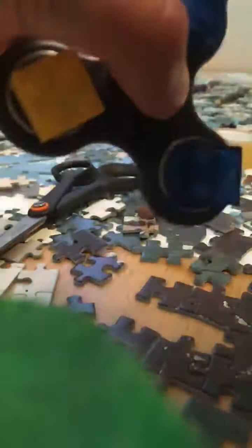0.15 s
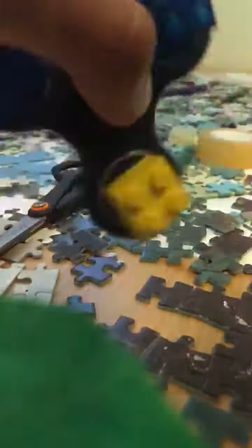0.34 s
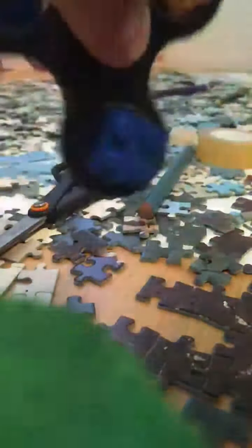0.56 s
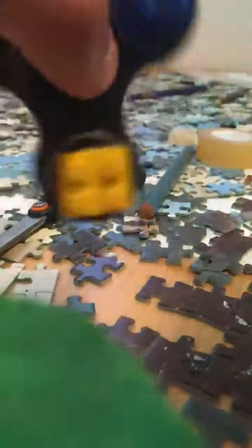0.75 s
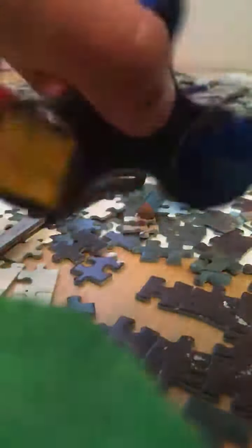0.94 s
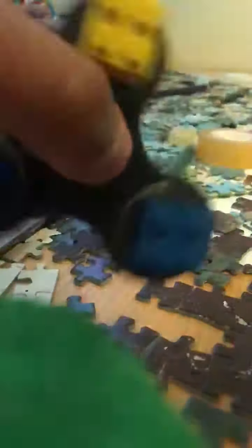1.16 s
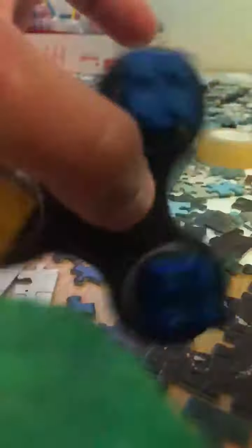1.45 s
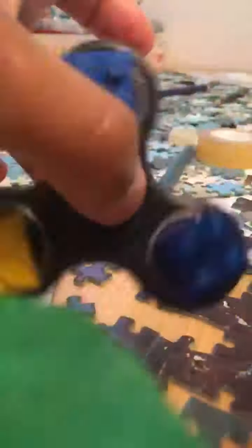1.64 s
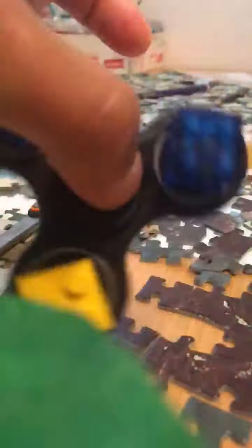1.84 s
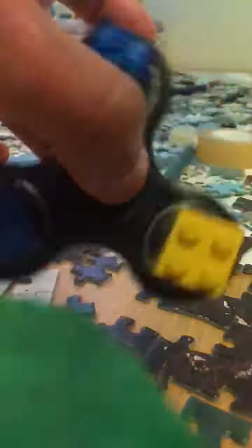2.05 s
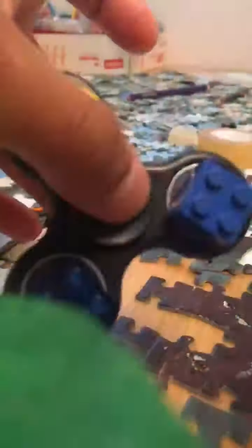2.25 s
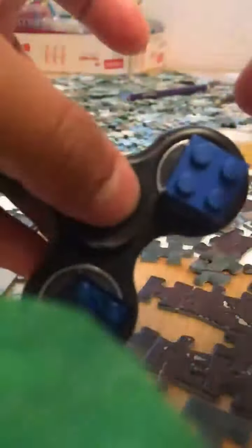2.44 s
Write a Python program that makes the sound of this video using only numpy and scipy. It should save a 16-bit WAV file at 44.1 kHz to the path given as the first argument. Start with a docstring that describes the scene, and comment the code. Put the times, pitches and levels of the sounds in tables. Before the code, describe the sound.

Sharp irregular plastic clicks and clatter from a finger spinner, close up in a quiet room

```python
"""A plastic hand spinner with loose toy bricks in its rings is turned and shaken close to a phone in a quiet room.
Filtered-noise hiss and a low hum of two sines run throughout; the hiss dips once near 0.2 s.
From 0.25 s each knock excites decaying modes and a noise crack, followed by small bounces and chatter;
among the knocks the grip thumps as gliding sines, the arms tick as beating sines
and the bricks scrape as trains of clicks through resonances; the room returns a short noise tail."""
import sys
import numpy as np
from scipy import signal
from scipy.fft import rfft, irfft
from scipy.io import wavfile

SR = 44100
rng = np.random.default_rng(int(sys.argv[2]) if len(sys.argv) > 2 else 0)


def gain_from_decibels(decibels):
    """Convert decibel values to linear amplitude factors."""
    exponent = np.asarray(decibels, float) / 20
    return 10 ** exponent


def int16_out(signal):
    """Quantize to a 16-bit WAV file."""
    q = np.round(np.clip(np.atleast_2d(signal).T, -1, 1) * 32767)
    wavfile.write(sys.argv[1], SR, q.astype(np.int16))


N = 114660

# modes of bricks and arms: [f/Hz, relative level when free/dB, relative level when damped/dB, free t60/s]
TOY_MODES = [(2054, -30.5, -38.5, 0.055), (3329, -12.5, -12, 0.014), (3736, -1.5, -1.5, 0.0077),
             (3953, -5, -3, 0.015), (4450, 3, -18, 0.017), (4553, -3, -13.5, 0.021), (5552, -4, 1, 0.013),
             (5913, -6, -3, 0.019), (6375, -13.5, -13, 0.024), (6660, -11, -24.5, 0.0024),
             (8940, -17.5, -11, 0.012), (8900, 0, 2.5, 0.015), (10610, -0.5, -2.5, 0.0074),
             (11440, 0, -2.5, .012), (12710, -4.5, -3.5, 0.0074), (14330, 2.5, -1, 0.009)]


def coloured(x, points):
    """Linear filtering: the spectrum is weighted by levels interpolated over log frequency."""
    f_points, level_db = np.array(points, float).T
    n = x.shape[-1]
    f = np.maximum(np.arange(n // 2 + 1) * SR / n, 1)
    gain = gain_from_decibels(np.interp(np.log(f), np.log(f_points), level_db))
    return irfft(rfft(x) * gain, n)


def fade(t, t60):
    """Exponential decay: the amplitude is 60 dB down after t60 seconds."""
    return np.exp(-np.log(1000) * t / t60)


def add(out, start_s, sound):
    """Superposition: a sound is summed into the mix from its start time."""
    i = int(start_s * SR)
    out[i:i + len(sound)] += sound[:len(out) - i]


def spinner():
    """Impact excitation: free and damped knocks strike the modes, each followed by dying chatter."""
    # knocks that leave the toy free to ring: [t/s, relative level/dB of arms 3-5 kHz,
    # brick walls 5-7 kHz, studs 9 kHz, edges over 10 kHz]
    ringing_knocks = [(0.3069, -10.5, -9, -15, -22), (0.323, -8, -10, -13, -16),
                      (0.4585, -33, -45.5, -48, -47), (0.4807, -10.5, -10.5, -18, -23),
                      (0.4934, -25.5, -36, -52.5, -41), (0.5022, -28.5, -29.5, -28.5, -35.5),
                      (0.5254, -30, -44.5, -36, -49.5), (0.5494, -22.5, -31, -46, -36),
                      (0.5788, -13, -33, -18.5, -43), (0.5881, -21, -22, -33, -44),
                      (0.6046, -13, -13.5, -19, -16.5), (0.6137, -28, -21, -41.5, -42.5),
                      (0.6579, -14, -6, -2.5, -10.5), (0.6632, -11.5, -34, -10.5, -11),
                      (0.673, -18, -31, -32.5, -35.5), (0.7188, -6.5, -13, -13, -8.5),
                      (0.7229, -13.5, -13, -27, -26), (0.7298, -11.5, -8.5, -5.5, -19),
                      (0.743, -39, -38, -18.5, -30.5), (0.7722, -4.5, -28, -22, -25.5),
                      (0.784, -20, -20, -30, -47.5), (0.7978, -49, -34, -35.5, -44.5),
                      (0.8699, -9, -5, -9.5, -19.5), (0.876, -12, -33, -32, -34),
                      (0.885, -17.5, -16, -22, -10.5), (1.0495, -19.5, -20.5, -16.5, -21.5),
                      (1.0983, -17, -41, -43, -45), (1.1656, -34.5, -44, -33, -54.5),
                      (1.179, -33, -57, -51, -52.5), (1.2006, -10.5, -5.5, -6.5, -17.5),
                      (1.209, -11, -12, -10, -25.5), (1.22, -28.5, -34.5, -39, -38),
                      (1.2618, -25, -33.5, -38, -43), (1.2815, -28, -33, -38, -43),
                      (1.3629, -11.5, -10.5, -8.5, -10), (1.3731, -15.5, -14.5, -13, -22),
                      (1.3837, -33.5, -23, -36, -36.5), (1.4707, -35.5, -51, -38.5, -47),
                      (1.5499, -18.5, -13, -13.5, -19), (1.566, -35, -31, -35, -26.5),
                      (1.5708, -24.5, -24.5, -40, -35), (1.6029, -23.5, -29.5, -38, -35.5),
                      (1.62, -30, -36, -40, -43.5), (1.6695, -26, -42, -37.5, -42),
                      (1.77, -28.5, -30, -24.5, -32.5), (1.8177, -13.5, -3, -9, -17.5),
                      (1.8261, -20.5, -26, -35, -44), (1.861, -42.5, -35, -46, -50),
                      (1.918, -41, -43, -41, -50), (1.9605, -13, -11, -10.5, -18),
                      (1.972, -20, -21, -39, -38.5), (1.983, -30.5, -18, -24, -36),
                      (2.004, -29, -33, -47, -39), (2.0606, -26, -40.5, -51, -51),
                      (2.2364, -19.5, -28, -20, -29), (2.2603, -21, -27, -30, -35),
                      (2.2776, -31.5, -39, -51.5, -38), (2.2973, -28, -28.5, -25, -44),
                      (2.3263, -21.5, -21.5, -39, -34), (2.333, -22, -39, -27.5, -29),
                      (2.3472, -17.5, -19, -21, -28), (2.3866, -20, -25, -25.5, -31),
                      (2.4177, -36, -34, -59, -53), (2.434, -36, -42, -52, -50)]
    # knocks damped by the grip: [t/s, then the same four relative levels/dB]
    damped_knocks = [(0.249, -21, -17, -20, -13), (0.2537, -8, -11, -23.5, -14),
                     (0.2658, -13.5, -15.5, -22, -18), (0.2731, -24, -30.5, -19, -27),
                     (0.3779, -15, -26, -16.5, -20), (0.3895, -16.5, -20, -22.5, -39),
                     (0.402, -35, -40, -52, -55), (0.411, -38, -48.5, -57, -55),
                     (0.4285, -39, -58, -63, -55), (0.6304, -34, -46, -27, -39),
                     (0.6507, -24, -49, -27.5, -37), (0.6893, -18, -18.5, -13.5, -20),
                     (0.7015, -34, -48, -38, -35), (0.8927, -52, -35, -36, -46),
                     (1.0792, -14.5, -11.5, -3.5, -13.5), (1.0898, -20, -18.5, -33, -46),
                     (1.114, -14, -20.5, -16.5, -19), (1.123, -35, -49, -58, -51),
                     (1.1408, -13.5, -24, -31, -26.5), (1.417, -11, -13.5, -14.5, -28),
                     (1.4271, -6.5, -6, -13.5, -18.5), (1.4484, -22, -37.5, -36, -45),
                     (1.5383, -9, -10.5, -10, -12), (1.598, -9, -12.5, -17.5, -16),
                     (1.625, -23, -23, -20.5, -28), (1.63, -30.5, -26.5, -41, -41.5),
                     (1.727, -11, -17.5, -2, -19.5), (1.753, -31, -32, -41, -36),
                     (1.7615, -29.5, -22.5, -33, -26), (1.7656, -36, -25.5, -36.5, -23),
                     (1.796, -6.5, -14, -8, -25), (1.871, -28, -44, -43.5, -47.5),
                     (1.879, -23.5, -28, -38, -35), (2.04, -11, -11.5, -7.5, -22),
                     (2.052, -8, -10.5, -21, -35.5), (2.067, -22.5, -37.5, -24, -35),
                     (2.2237, -10, -13.5, -38, -22.5), (2.2318, -42, -25.5, -23, -27),
                     (2.2473, -32, -19.5, -22, -25), (2.315, -15, -25.5, -25.5, -31),
                     (2.3176, -9, -29, -24, -30), (2.367, -29.5, -29, -29.5, -40)]
    free_rows = np.array(ringing_knocks, float)
    damped_rows = np.array(damped_knocks, float)
    small = chatter(np.concatenate([free_rows, damped_rows]))
    knock_scatter_db, chatter_scatter_db = 2.5, 6
    knock_length, chatter_length = 2048, 768  # samples
    groups = (
        (free_rows, False, knock_length, knock_scatter_db),
        (damped_rows, True, knock_length, knock_scatter_db),
        (small[::2], False, chatter_length, chatter_scatter_db),
        (small[1::2], True, chatter_length, chatter_scatter_db),
    )
    out = np.zeros(N)
    for rows, damped, length, scatter_db in groups:
        for row in rows:
            chance = rng.standard_normal((4, len(TOY_MODES), 1))
            noise = rng.standard_normal(length)
            add(out, row[0], knock(row[1:], damped, scatter_db, chance, noise))
    return out


def chatter(knocks):
    """Poisson process: random small impacts follow the decaying power of all earlier knocks."""
    count, rate_per_s = 1500, 220
    base_db, spread_db, treble_db = -27, 4, -9
    decay_t60_s = 0.13
    times = np.cumsum(rng.exponential(size=count)) / rate_per_s
    age = times[:, None] - knocks[:, 0]
    decayed_power = (age > 0) * fade(np.abs(age), decay_t60_s) ** 2
    power = decayed_power @ gain_from_decibels(2 * knocks[:, 1:]) + 1e-12
    chance_db = spread_db * rng.exponential(size=(count, 1))
    small = np.c_[times, 10 * np.log10(power) + base_db + chance_db]
    small[:, 3:] += treble_db  # studs and edges
    return small[times < N / SR]


def knock(part_db, damped, scatter_db, chance, noise):
    """Modal superposition: decaying sines of scattered level, pitch and decay under a broadband crack."""
    # centres of the four parts: [f/Hz]
    part_hz = (3900, 6100, 9000, 13000)
    # boundaries between the four parts: [f/Hz]
    part_edges_hz = (5100, 7400, 10200)
    detune, decay_scatter = 0.0092, 0.19  # fractional pitch spread, log decay spread
    crack_t60_s, crack_low_hz, crack_low_db = 0.019, 1296, -23
    hz, free_db, damped_db, t60 = np.array(TOY_MODES).T[:, :, None]
    if damped:
        mode_db, t60_share, rise_s = damped_db, 0.94, 0.00028
    else:
        mode_db, t60_share, rise_s = free_db, 1, 0.00043
    t = np.arange(len(noise)) / SR

    gain = gain_from_decibels(mode_db + part_db[np.searchsorted(part_edges_hz, hz)] + scatter_db * chance[0])
    decay = fade(t, t60_share * t60 * np.exp(decay_scatter * chance[1]))
    phase = 2 * np.pi * hz * (1 + detune * chance[2]) * t + chance[3]
    ring = (gain * decay * np.sin(phase)).sum(axis=0)

    # the crack follows the part levels, with a weaker low end
    colour = [(crack_low_hz, part_db[0] + crack_low_db)] + list(zip(part_hz, part_db))
    crack = coloured(noise, colour) * fade(t, crack_t60_s)
    return (ring + crack) * (1 - np.exp(-t / rise_s))


def scrapes():
    """Stick-slip friction: bricks sliding in their rings give uneven clicks that excite low resonances."""
    # slides of the bricks: [t/s, length/s, relative level/dB]
    slides = [(0.295, 0.032, -29), (0.661, 0.031, -25.5), (0.715, 0.012, -40.5), (0.789, 0.015, -38.5),
              (0.873, 0.025, -42.5), (1.073, 0.0062, -17.5), (1.078, 0.034, -37), (1.211, 0.015, -33),
              (1.609, 0.043, -32.5), (1.749, 0.035, -32), (1.859, 0.042, -41), (2.221, 0.043, -33),
              (2.396, 0.053, -43)]
    # spectrum of the clicks: [f/Hz, relative level/dB]
    slip_colour = [(400, -14), (1300, -14.5), (1800, -8.5), (3500, 0), (6000, -5.5), (10000, 0),
                   (16000, -15)]
    # resonances of the sliding bricks: [f/Hz, bandwidth/Hz, relative level/dB]
    slip_rings = [(1580, 120, 1), (2140, 110, -3.5), (3220, 240, 1.5)]
    rate_per_s, grain_spread_db = 1000, 3.5
    t = np.arange(N) / SR
    happens = rng.random(N) < rate_per_s / SR
    size = rng.standard_normal(N) * gain_from_decibels(grain_spread_db * rng.standard_normal(N))
    clicks = happens * size
    shape = np.zeros(N)
    for start_s, length_s, db in slides:
        progress = np.clip((t - start_s) / length_s, 0, 1)
        shape += gain_from_decibels(db) * np.sqrt(np.abs(np.sin(np.pi * progress)))
    slips = coloured(shape * clicks, slip_colour) / np.std(coloured(clicks, slip_colour))
    out = slips / 2
    for hz, width_hz, db in slip_rings:
        b, a = signal.iirpeak(hz, hz / width_hz, SR)
        out += gain_from_decibels(db) * signal.lfilter(b, a, slips)
    return out


def ticks():
    """Beating: three close modes of the hollow arms interfere in each short, rough, dull tick."""
    # ticks of the hollow arms: [t/s, nominal level/dB, f/Hz]
    arm_ticks = [(.264, -47, 2140), (.3775, -11.5, 2730), (.389, -16, 3100), (.4295, -46, 1520),
                 (.675, -21, 2030), (.686, -25.5, 1560), (.731, -23.5, 2030), (0.9848, -45, 1580),
                 (1.0065, -39, 1640), (1.628, -33.5, 1980), (1.861, -42, 1520), (1.878, -21.5, 3000),
                 (1.882, -25, 2600), (1.918, -39.5, 1600)]
    t60_at_1600_hz_s, t60_fall = 0.035, 2  # t60 falls with frequency to this power
    pitch_spread = 0.031  # fractional
    out, t = np.zeros(N), np.arange(2048) / SR
    for start_s, db, hz in arm_ticks:
        mode_hz = hz * (1 + pitch_spread * rng.standard_normal((3, 1)))
        ring = np.sin(2 * np.pi * mode_hz * t).mean(axis=0)
        decay = fade(t, t60_at_1600_hz_s * (1600 / hz) ** t60_fall)
        rise = 1 - np.exp(-t * hz)
        add(out, start_s, gain_from_decibels(db) * ring * decay * rise)
    return out


def fingers():
    """Damped oscillation: fingers shifting the grip give low thumps of exponentially falling pitch."""
    # thumps of the grip: [t/s, amplitude before decay/dB]
    thumps = [(0.25, -42), (0.66, -35.5), (1.075, -36.5)]
    start_hz, end_hz, glide_s, t60_s = 203, 79, 0.0028, 0.09
    out, t = np.zeros(N), np.arange(4096) / SR
    # phase in turns: the integral of the gliding frequency
    turns = end_hz * t + (start_hz - end_hz) * glide_s * (1 - np.exp(-t / glide_s))
    thump = np.sin(2 * np.pi * turns) * fade(t, t60_s)
    for start_s, db in thumps:
        add(out, start_s, gain_from_decibels(db) * thump)
    return out


def room(near):
    """Reverberation: convolution with coloured, decaying noise of unit energy stands for diffuse echoes."""
    # colour of the room's return: [f/Hz, relative level/dB]
    return_colour = [(500, 10), (1500, 14), (3000, -4), (5000, -3), (9000, -20), (16000, -24)]
    level_db, t60_s, build_up_s = -15.5, 0.23, 0.011
    t = np.arange(SR // 2) / SR
    tail = coloured(rng.standard_normal(len(t)), return_colour)
    tail *= fade(t, t60_s) * (1 - np.exp(-t / build_up_s))
    tail /= np.sqrt(np.sum(tail ** 2))
    return gain_from_decibels(level_db) * signal.fftconvolve(near, tail)[:N]


def background():
    """Stationary noise and beats: coloured hiss of slowly set level over two low hum tones."""
    # spectrum of the hiss: [f/Hz, relative level per Hz/dB]
    hiss_colour = [(62, -44), (105, -8), (272, -10), (443, -15.5), (608, -16), (13100, -23.5),
                   (16500, -31.5)]
    # course of the hiss, dipping once: [t/s, relative level/dB]
    hiss_swell = [(0, -2.5), (.18, -4), (.2, -11.5), (.24, -7.5), (.26, -1.5), (2.6, 0.5)]
    # hum tones: [f/Hz, rms level ahead of the bass cut/dB]
    hum_tones = [(61, -60), (75.4, -61.5)]
    hiss_db = -57.5  # rms where the relative level is 0 dB
    t = np.arange(N) / SR
    hiss = coloured(rng.standard_normal(N), hiss_colour)
    hiss *= gain_from_decibels(hiss_db + np.interp(t, *np.array(hiss_swell).T)) / np.std(hiss)
    hum = np.zeros(N)
    for hz, db in hum_tones:
        hum += np.sqrt(2) * gain_from_decibels(db) * np.sin(2 * np.pi * (hz * t + rng.random()))
    return hiss + hum


def scene():
    """Superposition: the near sounds and their room return join the ticks and background."""
    near = spinner() + fingers() + scrapes()
    return (near + room(near) + ticks() + background())[None]


def low_pass(x):
    """Removes everything above the highest recorded frequency."""
    return signal.sosfilt(signal.butter(12, 16820, fs=SR, output="sos"), x)


def record(dry):
    """Clipping and band limiting: the phone flattens the loudest peaks and cuts bass and top."""
    ceiling, bass_cut_hz, top_hz = 0.85, 62, 15750
    clipped = np.clip(dry, -ceiling, ceiling)
    bass_cut = signal.butter(2, bass_cut_hz, "high", fs=SR, output="sos")
    top_cut = signal.ellip(5, 1, 20, top_hz, fs=SR, output="sos")  # 1 dB ripple, 20 dB stopband
    mix = signal.sosfilt(top_cut, signal.sosfilt(bass_cut, clipped))
    return low_pass(mix)


dry = scene()
out = record(dry)
int16_out(out)
```